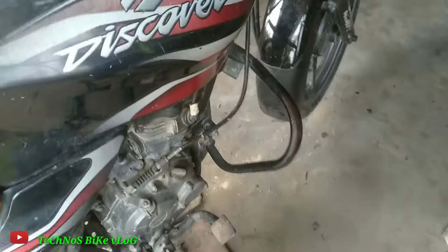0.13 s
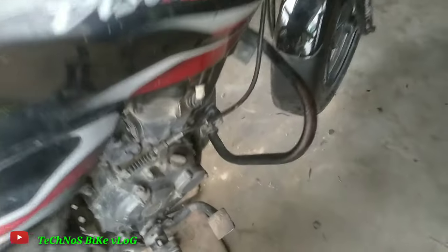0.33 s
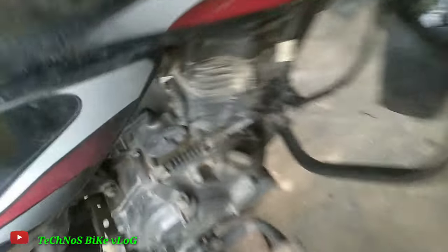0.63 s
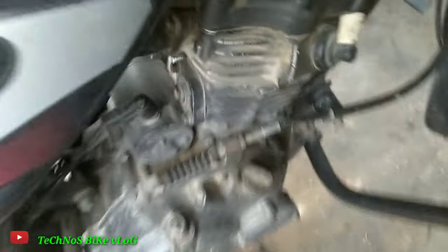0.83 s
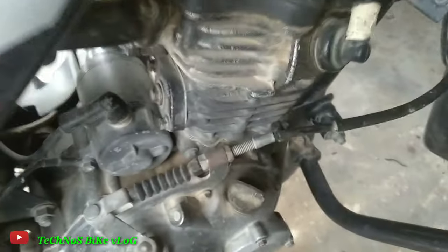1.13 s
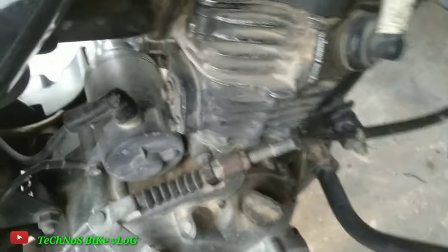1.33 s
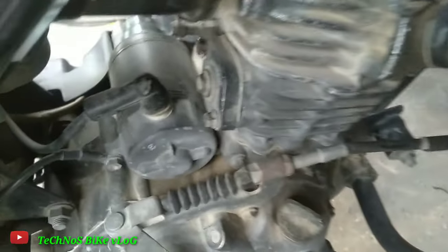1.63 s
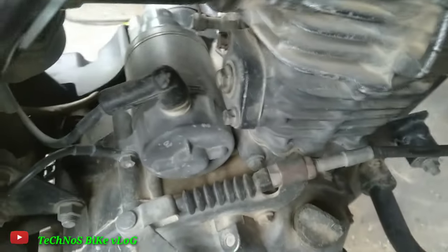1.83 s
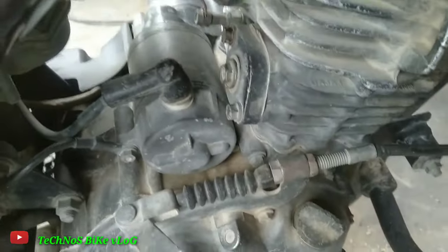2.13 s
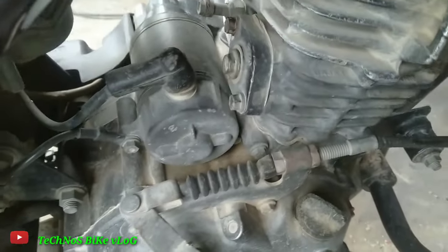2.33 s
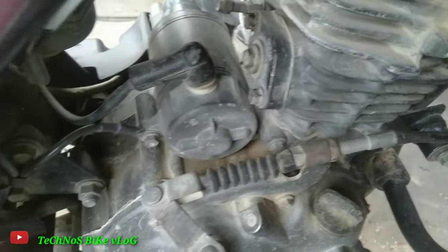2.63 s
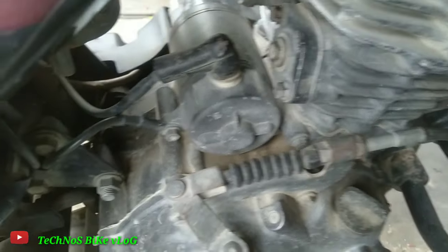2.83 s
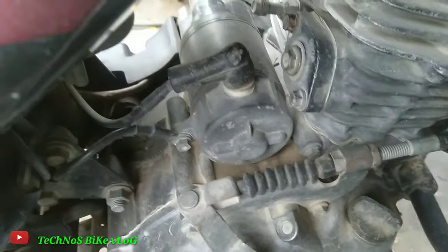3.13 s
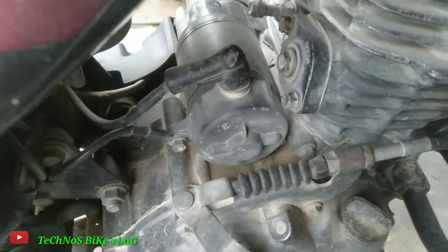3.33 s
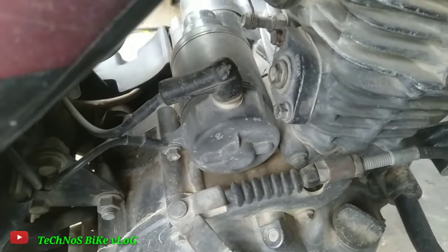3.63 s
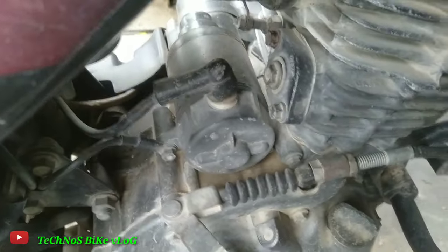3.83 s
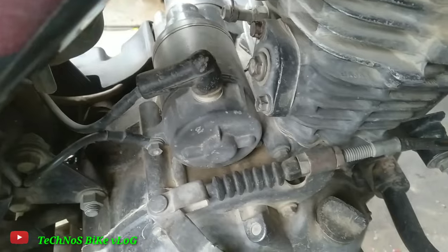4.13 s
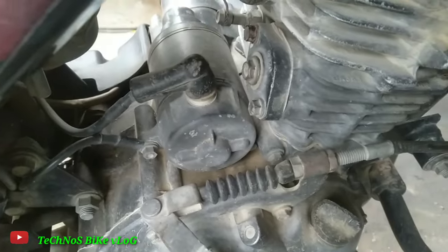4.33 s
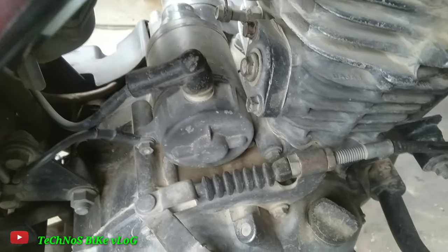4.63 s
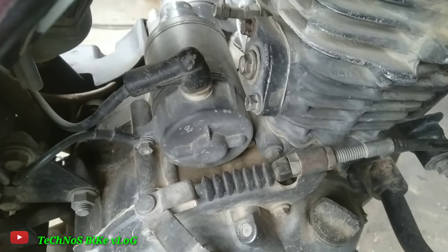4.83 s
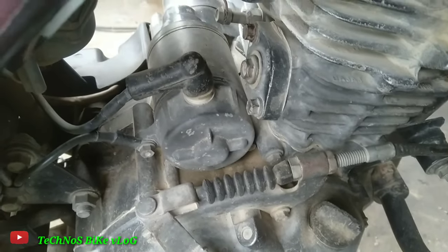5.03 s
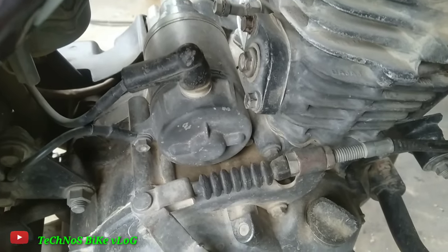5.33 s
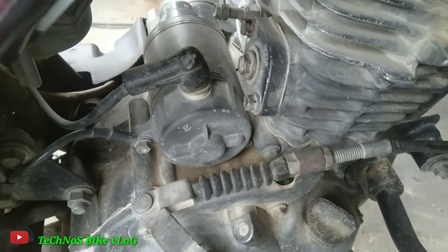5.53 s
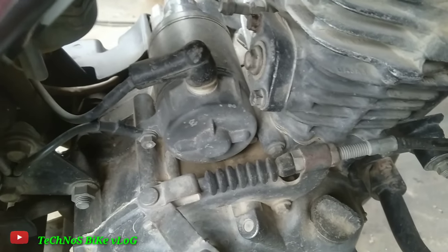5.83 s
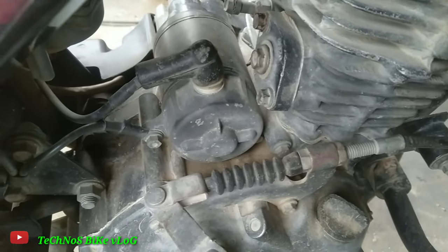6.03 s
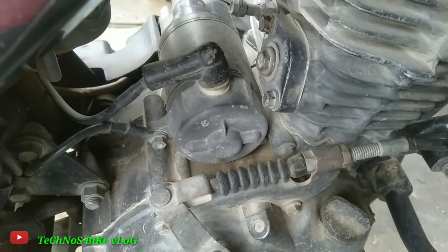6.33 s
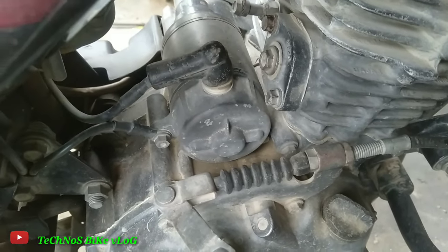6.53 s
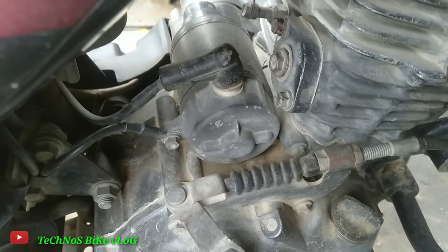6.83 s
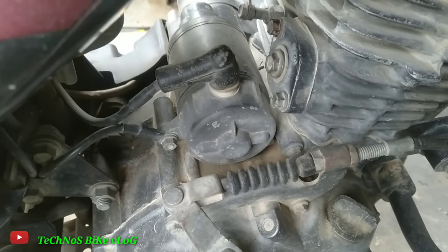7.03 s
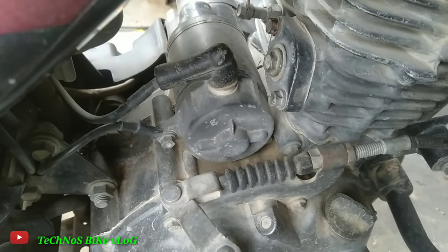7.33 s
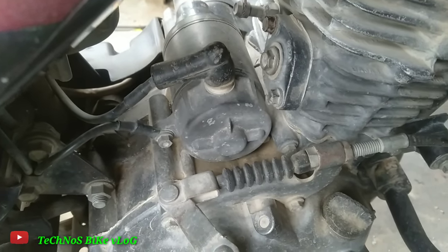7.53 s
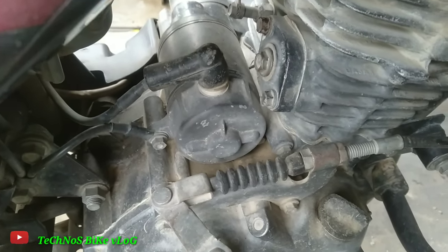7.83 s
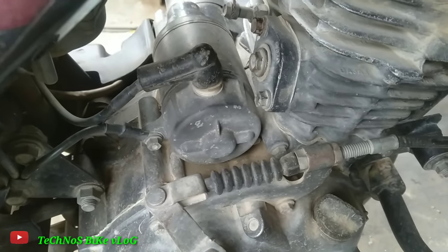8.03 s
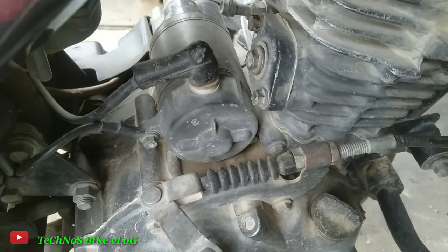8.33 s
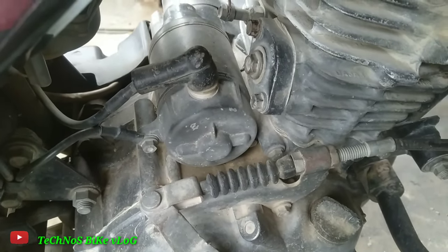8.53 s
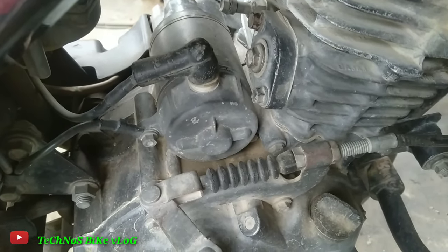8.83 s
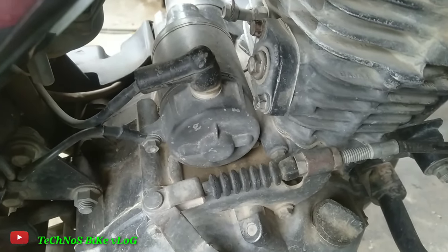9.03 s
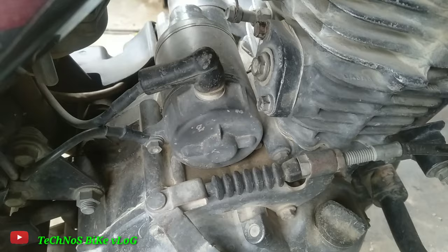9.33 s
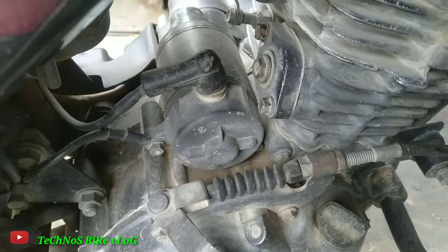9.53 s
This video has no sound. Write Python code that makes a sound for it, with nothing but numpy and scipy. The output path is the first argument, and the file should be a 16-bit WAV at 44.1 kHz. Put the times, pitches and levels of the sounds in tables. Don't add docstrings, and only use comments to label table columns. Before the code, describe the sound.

A small single-cylinder motorcycle engine catches, clatters at a rough idle, revs in four hard blips, then settles to a slow knocking rattle.

```python
import sys
import numpy as np
from scipy import signal
from scipy.fft import rfft, irfft
from scipy.io import wavfile
from scipy.ndimage import uniform_filter1d

SR = 44100
rng = np.random.default_rng(int(sys.argv[2]) if len(sys.argv) > 2 else 0)


def wrap_up_sound(samples):
    columns = np.atleast_2d(samples).T
    tamed = np.clip(columns, -1, 1)
    steps = np.round(tamed * 32767).astype(np.int16)
    wavfile.write(sys.argv[1], SR, steps)


def field_ratio(decibels):
    return 10 ** (np.asarray(decibels, dtype=float) / 20)


N = 426447
HZ = np.maximum(np.fft.rfftfreq(N, 1 / SR), 5)

# pitch_hz, level_db (per Hz)
METAL_COLOUR = [(250, -0.5), (400, -2), (1500, -1.5), (2000, -5.5), (3000, -4.5), (5000, -4), (6500, -1),
                (7800, -7.5), (9000, -13.5), (12000, -17.5), (15500, -24)]
# start_s, piston_knock_db, fin_ping_db
HARD_FIRINGS = [(0.321, -33, -33), (1.275, -38, -46), (1.431, -36, -42), (2.111, -29, -44),
                (2.429, -32, -38.5), (2.646, -35, -42), (2.863, -24, -30), (3.595, -32, -30),
                (3.6635, -46, -40), (4.333, -52, -28), (4.956, -44, -27), (6.63, -28, -35),
                (6.6993, -35, -44), (6.8493, -51, -34), (7.015, -38, -48), (7.1, -35, -44),
                (7.1882, -32, -35), (7.2793, -31, -42.5), (7.367, -28.5, -32.5), (7.559, -34, -48),
                (7.742, -32, -39), (7.833, -33, -60), (8.0112, -29, -33.5), (8.0975, -30, -48),
                (8.1874, -29.5, -52), (8.2844, -34, -52), (8.3843, -26, -37), (9.0088, -32, -51),
                (9.142, -42, -38.5), (9.444, -34, -39.5)]
THROTTLE_OPEN = [.26, 2.80, 3.58, 4.28, 4.94]
# load_ping_db, snap_depth (0 none, about 1 full), overrun_drone_db, drone_length_s
THROTTLE_BLIPS = [(-24, 0, -31.5, 0.19), (-17, 0, -35, 0.74), (-15, 0.7, -38.5, 0.81),
                  (-15.5, 1.15, -36.5, 0.9), (-15, 0.35, -41, 1.17)]


def rms_one(x):
    return x / np.sqrt(np.mean(x ** 2) + 1e-20)


def in_time(rows):
    s, *columns = np.transpose(rows)
    return [np.interp(np.arange(N) / SR, s, c) for c in columns]


def shaped(x, points):
    hz, db = np.transpose(points)
    return irfft(rfft(x) * field_ratio(np.interp(np.log(HZ), np.log(hz), db)), N)


def resonate(x, modes, sign=-1):
    out = 0
    for k, (hz, width_hz, db) in enumerate(modes):
        r = np.exp(-np.pi * width_hz / SR)
        b = np.array([1, 0, -1]) * (1 - r * r) / 2
        a = [1, -2 * r * np.cos(2 * np.pi * hz / SR), r * r]
        out = out + sign ** k * field_ratio(db) * signal.lfilter(b, a, x + 1e-18)
    return out


def dying(at_s, sizes, decay_s):
    kicks = np.bincount(np.clip((at_s * SR).astype(int), 0, N - 1), sizes, N)
    return signal.lfilter([1], [1, -np.exp(-1 / (decay_s * SR))], kicks + 1e-18)


def swell(s, length, skew=0.31):
    return np.sin(np.pi * np.clip((np.arange(N) / SR - s) / length, 0, 1) ** skew) ** 2


def grains(spread_db, per_s, weight):
    sizes = field_ratio(spread_db * np.minimum(rng.exponential(1, N), 4))
    taps = (rng.random(N) < per_s / SR) * sizes
    return rng.standard_normal((2, N)) * (1 + weight * signal.lfilter([1], [1, -.97], taps))


def widen(pair, alike=0.0057, lag=97):
    # pitch_hz, side_minus_centre_db
    side_level = [(60, -13), (200, -18), (380, -7.5), (700, -6), (1650, -1.5), (2380, 2), (3150, 8.5),
                  (3800, 7), (4500, 0.5), (8120, -0.5), (15000, 1)]
    own = np.sqrt(1 - min(alike, 1)) * pair[1]
    delayed = np.sqrt(max(alike, 0)) * np.roll(pair[0], int(lag))
    side = shaped(own + delayed, side_level)
    return np.array([pair[0] + side, pair[0] - side])


def workshop():
    air = field_ratio(-54.5) * rms_one(shaped(rng.standard_normal((2, N)), METAL_COLOUR))
    hum = rms_one(resonate(rng.standard_normal(N), [(114.9, 3.0, 0)]))
    return air + field_ratio(-57) * hum


def crank():
    # start_s, cycles_done, cycle_length_s
    turning = [(.204, 0, .066), (.365, 3, .041), (1.2, 18, .079), (2.302, 34, .062), (2.81, 41, .066),
               (2.982, 45, .032), (3.55, 60, .047), (3.729, 65, .026), (4.26, 82, .039), (4.397, 86, .026),
               (4.922, 104, .035), (5.04, 108, .023), (6.036, 140, .044), (6.85, 154, .078),
               (7.651, 163, .094), (8.384, 171, .092), (8.826, 178, .054), (9.669, 190, .078)]
    s, done, length = np.transpose(turning)
    done = np.round(done)
    number = np.arange(done[-1] + 1)
    k = np.clip(np.searchsorted(done, number, side="right") - 1, 0, len(done) - 2)
    span = done[k + 1] - done[k]
    u = (number - done[k]) / span
    even = s[k] + (s[k + 1] - s[k]) * u * u * (3 - u - u)
    even = even + span * u * (1 - u) * ((1 - u) * length[k] - u * length[k + 1])
    hard_s = np.transpose(HARD_FIRINGS)[0]
    hard = abs(even - hard_s[:, None]).argmin(axis=1)
    late = np.zeros(len(even))
    late[hard] = hard_s - even[hard]
    known = np.union1d(done.astype(int), hard)
    starts = even + np.interp(number, known, late[known])
    turns = np.interp(np.arange(N) / SR, even, number)
    return starts, hard, uniform_filter1d(uniform_filter1d(turns, size=3001), size=3001)


def controls(starts):
    # start_s, level_db
    shaking = [(0, -48), (.195, -49.5), (.21, -33), (.54, -34.5), (1.3, -36), (2.29, -31), (2.72, -34),
               (2.82, -31), (3.53, -30.5), (4.6, -30), (5.5, -29.5), (6.45, -30.5), (7.35, -38),
               (8.0, -35.5), (8.37, -37), (8.4, -31), (8.78, -31.5), (9.67, -34)]
    usual_db, usual_per_s = -34, 20
    per_s = 1 / np.interp(np.arange(N) / SR, starts, np.gradient(starts))
    return in_time(shaking)[0] - usual_db, np.log2(per_s / usual_per_s)


def firings(starts, hard, effort_db):
    knock_usual_db, ping_usual_db, uneven_db, load_s = -32.5, -32, 2.5, .14
    usual_db = effort_db[np.minimum((starts * SR).astype(int), N - 1)]
    uneven = uneven_db * rng.standard_normal((len(starts), 2)).T
    knock_db, ping_db = usual_db + uneven + [[knock_usual_db], [ping_usual_db]]
    for s, (db, *_) in zip(THROTTLE_OPEN, THROTTLE_BLIPS):
        ping_db[(starts > s) & (starts < s + load_s)] = db
    ping_db += 2.5 * rng.standard_normal(len(starts))
    knock_db[hard], ping_db[hard] = np.transpose(HARD_FIRINGS)[1:] + [[2.5], [14]]
    jolt_db = 0.09 * (knock_db - usual_db - knock_usual_db)
    return knock_db, ping_db, jolt_db


def frame_boom():
    # start_s, level_db
    boom_level = [(0, -74), (.22, -57), (.4, -53), (.6, -49), (2.6, -51), (3.0, -48.5), (6.3, -59),
                  (7, -71), (9.67, -64)]
    # pitch_hz, width_hz, level_db
    frame_modes = [(99.4, 42, -4), (160.4, 19, -1), (212, 14, -5.5)]
    boom = resonate(rng.standard_normal(N), frame_modes, sign=1)
    return field_ratio(in_time(boom_level)[0]) * rms_one(resonate(boom, frame_modes, sign=1))


def gulps():
    # start_s, level_db, length_s
    breaths = [(2.846, -58, 0.15), (3.604, -48, 0.12), (4.403, -45, 0.2), (5.027, -45, 0.25)]
    intake = [(76, 36, 0)]
    air = rms_one(resonate(resonate(rng.standard_normal(N), intake), intake))
    return air * sum(field_ratio(db) * swell(s, length) for s, db, length in breaths)


def thuds():
    # start_s, level_db, length_s
    late_burns = [(0.637, -36, 0.14), (1.465, -24.5, 0.087), (6.99, -27, 0.1), (7.844, -29.5, 0.1)]
    # pitch_hz, width_hz, level_db
    silencer_modes = [(159.4, 25, -11.5), (229, 22, -1.5), (329, 25, -15.5), (396, 30, -13.5)]
    t = np.arange(N) / SR
    return sum(field_ratio(db + d) * swell(s, length) * np.sin(2 * np.pi * hz * (t - s))
               for s, db, length in late_burns for hz, width_hz, d in silencer_modes)


def pipe_gain(hz):
    # pitch_hz, width_hz, level_db
    pipe_modes = [(98, 27, -8.5), (130.6, 9.6, -5), (163, 8.6, -6.5), (187, 16, -1), (292.5, 28, 3),
                  (363, 21, 3), (457, 27, 7)]
    grid = np.arange(1000.)
    lift = .09 + sum(field_ratio(db) / np.sqrt(1 + (2 * (grid - at_hz) / width_hz) ** 2) ** 1.5
                     for at_hz, width_hz, db in pipe_modes)
    return np.interp(hz, grid, lift)


def drone(turns):
    # multiple_of_cycle_rate, level_db
    multiples = [(1, -20), (2, -35), (3, -39), (4, -5), (5, -53), (6, -6), (7, -51), (8, -10), (9, -28),
                 (10, -15.5), (11, -40), (12, -15), (13, -29), (14, -18), (16, -21)]
    # start_s, cycles_per_s, drone_trim_db
    revs = [(2.85, 27, -10), (2.97, 32.3, -8), (3.26, 27.2, -1), (3.51, 22.6, 0), (3.62, 26.2, -6),
            (3.76, 37.3, 4), (3.98, 32.7, 3), (4.27, 26.7, 1), (4.32, 29.7, -8), (4.48, 38.2, -2),
            (4.55, 37.2, 1), (4.75, 33.3, 2), (4.92, 29.8, -2), (5.06, 39.3, 0), (5.18, 40.9, 5),
            (5.39, 35.6, 4), (5.58, 31.2, 3), (5.96, 24, 7), (6.3, 19.6, -3)]
    per_s, trim_db = in_time(revs)
    before_blips = np.arange(N) < revs[0][0] * SR
    turns = np.cumsum(np.where(before_blips, np.gradient(turns), per_s / SR))
    per_s = np.gradient(turns) * SR
    offsets = rng.uniform(0, 2 * np.pi, len(multiples))
    tone = sum(field_ratio(db) * pipe_gain(round(k) * per_s) * np.sin(2 * np.pi * round(k) * turns + p)
               for (k, db), p in zip(multiples, offsets))
    wait_s, skew, peaked = .06, .7, .45
    swells = sum(field_ratio(db) * swell(s + wait_s, length, skew) ** peaked
                 for s, (*_, db, length) in zip(THROTTLE_OPEN, THROTTLE_BLIPS))
    return field_ratio(5.5 + trim_db) * swells * tone


def exhaust(turns, effort_db, speed):
    # pitch_hz, level_db (per Hz)
    pipe_colour = [(18, -61), (30, -28), (45, -31), (75, -2), (119, 5.5), (215, 8), (250, 1), (354, 12),
                   (529, -4), (600, 8.5), (780, 4.5), (1320, -120)]
    rumble = rms_one(shaped(rng.standard_normal((2, N)), pipe_colour))
    rumble = field_ratio(-45 + 0.72 * effort_db + 1.5 * speed) * rumble
    low = drone(turns) + thuds() + gulps() + frame_boom()
    return widen(rumble, alike=0.071) + low * field_ratio([[.8], [-.8]])


def strikes(rows, trim_db, decay_s, rough, rise, size):
    t = np.arange(2000) / SR
    out, luck = np.zeros((2, N + 2000)), rng.standard_normal((len(rows), 2, 2000))
    shape = (1 - np.exp(-t / (rise * decay_s))) * np.exp(-t / decay_s)
    for (s, db, hz), noise in zip(rows, luck):
        at = int((s - .001) * SR)
        wobble = 1 + rough * uniform_filter1d(noise, size=size) * np.sqrt(size)
        tone = np.sin(2 * np.pi * hz * t + [[0], [noise[0, 0]]])
        out[:, at:at + 2000] += field_ratio(db + trim_db) * shape * wobble * tone
    return widen(signal.sosfilt(signal.butter(2, 250, "high", fs=SR, output="sos"), out[:, :N]))


def clacks():
    # start_s, peak_db, pitch_hz
    case_hits = [(0.212, -25, 1310), (0.374, -19, 1066), (0.91, -21, 1130), (1.281, -17.5, 1068),
                 (1.438, -18, 635), (1.512, -17, 616), (1.658, -23, 660), (1.928, -18, 612),
                 (1.994, -18, 623), (2.123, -20.5, 1336), (2.25, -20, 1070), (2.581, -27, 1055),
                 (2.659, -18, 1380), (2.738, -23, 650), (2.809, -17, 1074), (2.902, -20, 637),
                 (2.988, -33, 1220), (3.027, -36, 1370), (3.239, -22, 636), (3.337, -33, 597),
                 (3.504, -17, 1164), (3.569, -13.5, 1071), (3.736, -27, 1330), (3.878, -17, 1310),
                 (3.968, -32, 1276), (4.068, -18.5, 1350), (4.378, -18.5, 1347), (4.628, -36, 1140),
                 (4.706, -33, 1354), (4.862, -17, 1401), (5.219, -20, 630), (5.565, -25, 1054),
                 (5.645, -21, 1121), (5.814, -32, 1144), (5.851, -44, 1380), (6.098, -18, 1394),
                 (6.247, -22, 1415), (6.36, -22, 754), (6.392, -20, 1007), (6.476, -22, 1086),
                 (6.565, -33, 1220), (6.951, -19.5, 1020), (7.851, -21, 1033), (7.935, -24, 615),
                 (8.029, -29, 676), (8.097, -23, 607), (8.299, -25, 1310), (8.39, -19, 1053),
                 (8.473, -21, 683), (8.541, -17, 637), (8.663, -19, 702), (8.728, -19, 995),
                 (8.921, -20, 1160), (8.983, -26, 1430), (9.02, -22, 1390), (9.235, -17.5, 625),
                 (9.378, -21, 1410), (9.456, -24, 610), (9.535, -30, 1280), (9.598, -22, 1085)]
    return strikes(case_hits, -6, 0.014, rough=0.56, rise=0.3, size=25)


def ticks():
    # start_s, peak_db, pitch_hz
    fin_hits = [(0.2063, -35, 6470), (0.2228, -27, 6440), (0.3223, -21, 5700), (2.431, -23, 4640),
                (2.6455, -25, 5280), (2.8104, -27, 5860), (2.8284, -23, 6530), (2.865, -29, 6900),
                (2.9098, -19, 5840), (2.9474, -18, 5750), (3.5537, -20, 5140), (3.5961, -22, 5780),
                (3.634, -23, 6270), (3.667, -15.5, 5670), (3.6977, -18, 5060), (4.299, -21, 5800),
                (4.3346, -17, 5600), (4.3671, -27, 6380), (4.3972, -29, 6300), (4.4257, -31, 5960),
                (4.6088, -19, 5220), (4.9237, -19, 5450), (4.956, -25, 5810), (4.986, -27, 5900),
                (5.0136, -23, 5730), (5.041, -21, 5050), (5.0645, -25, 5100), (5.1002, -32, 4280),
                (5.1226, -33, 6230), (5.1461, -26, 5040), (5.399, -26, 5020), (5.4465, -19, 4800),
                (5.754, -24, 6750), (6.0954, -26, 4780), (6.2241, -22, 5100), (6.3857, -25, 4160),
                (6.501, -20.5, 4290), (6.5649, -26, 4760), (6.6302, -26, 4200), (6.7004, -28, 5100),
                (6.774, -34, 5030), (6.85, -21, 4170), (7.0143, -26, 5090), (7.1879, -29, 5150),
                (7.3685, -26, 4570), (7.5561, -30, 5150), (7.7412, -31, 5300), (8.0096, -25.5, 4530),
                (8.0974, -30.5, 4980), (8.2825, -31, 4630), (8.3937, -24, 6080), (8.8856, -26, 5100),
                (8.946, -28, 5070), (9.0098, -23, 5160), (9.0757, -22, 4150), (9.1446, -25.5, 4320),
                (9.2887, -25, 5170), (9.366, -30, 5040), (9.4428, -31, 6000), (9.598, -26, 5100)]
    return strikes(fin_hits, -3.5, 0.0043, rough=0.9, rise=0.44, size=11)


def raps():
    # start_s, peak_db, pitch_hz
    cover_hits = [(0.7137, -27, 2950), (1.5872, -34, 2770), (2.182, -30, 2480), (2.4048, -39, 2550),
                  (2.647, -30, 2690), (2.809, -22, 2630), (2.8902, -23, 2300), (2.983, -32, 2670),
                  (3.2758, -28, 2200), (3.399, -25, 2290), (3.53, -25, 2630), (3.6964, -24, 2160),
                  (3.7792, -36, 2580), (3.8381, -29, 2240), (3.9094, -28, 2520), (5.198, -32, 2760),
                  (5.2523, -25, 2190), (5.2896, -34, 2300), (5.3591, -27, 2160), (5.5467, -32, 2668),
                  (5.7542, -22, 3030), (5.9126, -21, 2630), (6.0146, -21, 3030), (6.0584, -25, 2270),
                  (6.417, -27, 3010), (6.539, -35, 2240), (6.6297, -44, 2510), (6.7001, -36, 2970),
                  (6.8178, -34, 3080), (7.0133, -32, 2520), (7.1003, -34, 2660), (7.3685, -29, 3040),
                  (7.5556, -33, 3180), (7.667, -32, 2470), (7.7417, -29, 2450), (7.84, -25, 3110),
                  (8.0096, -38, 2490), (8.0973, -27, 3260), (8.2845, -37, 3050), (8.387, -26, 2650),
                  (8.5356, -20.5, 2440), (8.6032, -28, 2560), (8.8273, -34, 2680), (8.8656, -27, 3060),
                  (9.1425, -32, 2530), (9.288, -31, 3100), (9.3321, -29, 3130), (9.4444, -33, 2500),
                  (9.5187, -33, 2420), (9.597, -32.5, 2670)]
    return strikes(cover_hits, -3.5, 0.0052, rough=0.7, rise=0.43, size=25)


def knock(starts, knock_db, ping_db):
    # pitch_hz, width_hz, level_db
    barrel_modes = [(1017, 200, -2.5), (2480, 370, -1.5), (3140, 470, -2.5), (4210, 230, -2)]
    # pitch_hz, width_hz, level_db
    fin_modes = [(5100, 260, -3.5), (6180, 410, -5), (6650, 270, -4.5), (10200, 4600, -59)]
    rise = 90
    slap = uniform_filter1d(dying(starts, field_ratio(knock_db + 4.0), .015), size=2 * rise)
    slap = slap * rng.standard_normal((2, N))
    ping = dying(starts, field_ratio(ping_db + 7.5), .0045)
    ping = uniform_filter1d(ping, size=rise, origin=rise // 3) * rng.standard_normal((2, N))
    return widen(resonate(slap, barrel_modes) + resonate(ping, fin_modes))


def early_ring():
    # start_s, level_db
    buzz_level = [(0, -77), (.2, -51), (.3, -39.5), (.6, -43.5), (1.2, -46.5), (1.6, -43), (2.5, -45.5),
                  (3.2, -76)]
    buzz = resonate(grains(5.0, 40, 0.71), [(696, 17, -2), (734, 33, 0)])
    return field_ratio(in_time(buzz_level)[0]) * rms_one(buzz)


def lull(starts):
    t = np.arange(N) / SR
    place = np.interp(t, starts, np.arange(len(starts))) % 1
    depth_db = -112 * np.clip(np.interp(t, starts, np.gradient(starts)) - .03, 0, .07)
    return field_ratio(depth_db * np.clip((place - .72) / 0.043, 0, 1))


def clatter(starts, effort_db, speed, jolt_db):
    # place (0-1), decay_s, crankcase_db, cover_db, fins_db, air_db
    contacts = [(0.0, 0.0005, -14, -10, -1, -60), (.18, 0.0046, -5, 28, -5.5, 2),
                (.33, 0.016, -22, 4, -7.5, 13.5), (.45, 0.0044, -6, 24, -13, 13),
                (.59, 0.096, -10.5, 62, -12, 5), (.7, 0.022, -34, -17, -12, 17)]
    # pitch_hz, width_hz, level_db
    engine_modes = [(471, 12, 0), (637.5, 27.6, 11.5), (1070, 132, 6), (1186, 36, 2.5), (1353, 106, 12.5),
                    (1700, 35, 16.5), (2300, 1000, 5.5), (3000, 290, -12.5), (4700, 970, 0), (6380, 100, -28),
                    (8950, 250, -4), (10950, 250, -3), (12300, 200, -5), (13460, 200, -5), (14630, 200, 0)]
    engine_parts = [
        (-35.5, 0.75, 0.5, -3.5),
        (-48, 1.38, 0, -8),
        (-45, 0.9, 4.5, -1.5),
        (-54.5, 0.89, 2, -5),
    ]
    edges_hz = [200, 1950, 4000, 8200, 16000]
    length, luck = np.gradient(starts), rng.standard_normal((len(starts), len(contacts), 6))
    hush = lull(starts)
    out = early_ring()
    opening = sum(depth * swell(s - .01, 0.21, 0.72)
                  for s, (_, depth, *_) in zip(THROTTLE_OPEN, THROTTLE_BLIPS))
    flare_db = 10 * dying(np.array(THROTTLE_OPEN[:2]) + 0.022, [.6, 1], 0.11)
    tap_weights = [0.54, 0.71, 0.69, 0.14]
    for part, ((db, share, speed_db, lift_db), weight) in enumerate(zip(engine_parts, tap_weights)):
        level_db = db + share * effort_db + speed_db * speed + lift_db * opening
        level_db += (part > 1) * flare_db
        uneven_db = 1.6 * luck[:, :, 1] + 1.8 * luck[:, :, 2 + part]
        shake = .3
        for k, c in enumerate(contacts):
            at_s = starts + (c[0] + 0.036 * luck[:, k, 0]) * length
            shake = shake + dying(at_s, field_ratio(c[2 + part] + uneven_db[:, k] + jolt_db), c[1])
        shake = uniform_filter1d(shake * hush, size=160)
        shake = shake / np.sqrt(uniform_filter1d(shake ** 2, size=9000))
        impacts = shake * grains(1.54, 200, weight)
        modes = [m for m in engine_modes if edges_hz[part] < m[0] < edges_hz[part + 1]]
        band = signal.butter(4, edges_hz[part:part + 2], "band", fs=SR, output="sos")
        ringing = shaped(impacts + resonate(impacts, modes, sign=0.74), METAL_COLOUR)
        out = out + field_ratio(level_db) * rms_one(signal.sosfilt(band, ringing))
    return widen(out)


def scene():
    starts, hard, turns = crank()
    effort_db, speed = controls(starts)
    knock_db, ping_db, jolt_db = firings(starts, hard, effort_db)
    engine = clatter(starts, effort_db, speed, jolt_db) + knock(starts, knock_db, ping_db)
    engine = engine + exhaust(turns, effort_db, speed) + workshop()
    return engine + clacks() + ticks() + raps()


def thin_out(mid_side):
    # start_s, reach_hz
    fray = [(0, 250), (.7, 220), (.9, 620), (1.35, 560), (1.5, 340), (1.9, 400), (2.05, 200), (2.3, 90),
            (3.2, 130), (3.45, 380), (3.65, 150), (3.85, 330), (4.0, 130), (4.45, 260), (4.6, 130),
            (9.67, 110)]
    # pitch_hz, level_db
    starve = [(1500, -18), (2800, -5), (4300, -9), (6500, -5), (8300, .3), (11000, .3), (13500, .6),
              (15500, 1.5)]
    # pitch_hz, level_db
    top_edge = [(12000, -16), (13500, -7), (14600, -2), (15500, 1)]
    hz, s, z = signal.stft(mid_side, SR, nperseg=1536)
    hz, wander = hz[:, None], uniform_filter1d(rng.standard_normal((4, len(s))), size=3, axis=1)
    notch_width = 190 + 90 * np.tanh(wander[1])
    z = z * field_ratio(-18 * np.exp(-((hz - 8230 - 120 * wander[0]) / notch_width) ** 2))
    z = z * field_ratio(-9 * np.exp(-((hz - 10200 - 120 * wander[3]) / 130) ** 2))
    gap_hz = 3640
    bright = (abs(z[0, 150:260]) ** 2).sum(axis=0)
    calm = bright < 5.5 * uniform_filter1d(bright, size=9)
    fray_hz = np.interp(s, *np.transpose(fray))
    reach = fray_hz * rng.exponential(1, len(s)) ** .8
    low, high = gap_hz - 210 - .5 * reach, gap_hz + 170 + 170 * abs(wander[2])
    slots = rng.random((len(hz) // 4 + 1, len(s) // 2 + 1))
    slots = slots.repeat(4, axis=0).repeat(2, axis=1)[:len(hz), :len(s)]
    frayed = (hz > 2550) & (hz < low) & (slots < (fray_hz / 1150) ** 2)
    z[0] *= field_ratio(-48 * calm * (((hz > low) & (hz < high)) | frayed))
    power = abs(z) ** 2 + 1e-20
    power = np.where(hz > 6800, power.sum(axis=0), power)
    near = uniform_filter1d(power, size=41, axis=1)
    usual = near.mean(axis=2, keepdims=True) * np.where(s < .23, 1e-3, 1)
    patches = uniform_filter1d(rng.standard_normal(z.shape[1:]), size=9, axis=0)
    patches = uniform_filter1d(patches, size=3, axis=1)
    starve_db = np.interp(hz, *np.transpose(starve)) + 6 * patches
    bar = near ** .89 * usual ** .11 * field_ratio(2 * starve_db)
    keep = (uniform_filter1d(power, size=7, axis=1) > bar) & (hz < 15560)
    edge_db = np.interp(hz, *np.transpose(top_edge))
    keep &= (hz < top_edge[0][0]) | (near > usual * field_ratio(2 * edge_db))
    return signal.istft(z * keep, SR, nperseg=1536)[1][:, :N]


def band_limit(x):
    return signal.sosfilt(signal.butter(12, 15560, fs=SR, output="sos"), x)


def record(dry):
    # pitch_hz, left_minus_right_db
    port_lean = [(60, 1.5), (110, 1.0), (200, 1.5), (380, 2.0), (700, 0.5), (1290, -0.5), (2380, 1.0),
                 (4400, -1.5), (8120, -0.5), (15000, 4.5)]
    dry = signal.sosfilt(signal.butter(2, 50, "high", fs=SR, output="sos"), dry)
    left = shaped(dry[0], np.multiply(port_lean, [1, .5]))
    right = shaped(dry[1], np.multiply(port_lean, [1, -.5]))
    mid, side = thin_out(np.array([left + right, left - right]) / 2)
    return band_limit(np.array([mid + side, mid - side]))


dry = scene()
out = record(dry)
wrap_up_sound(out)
```